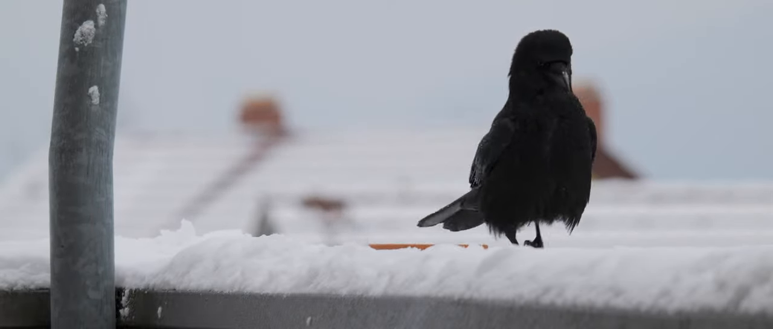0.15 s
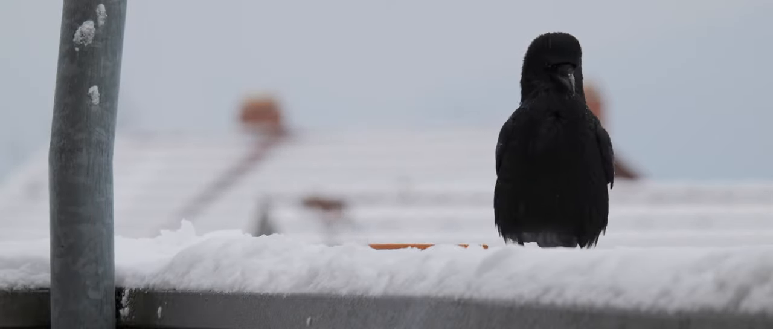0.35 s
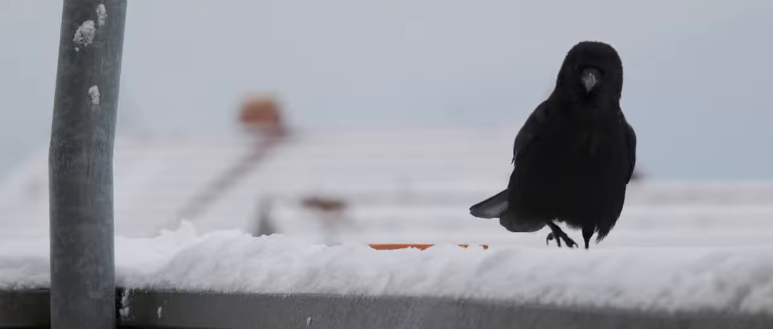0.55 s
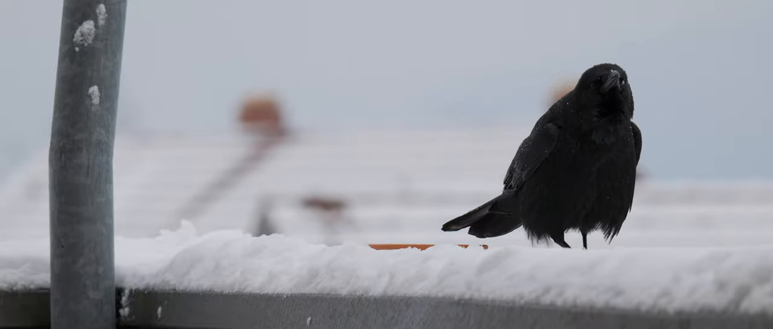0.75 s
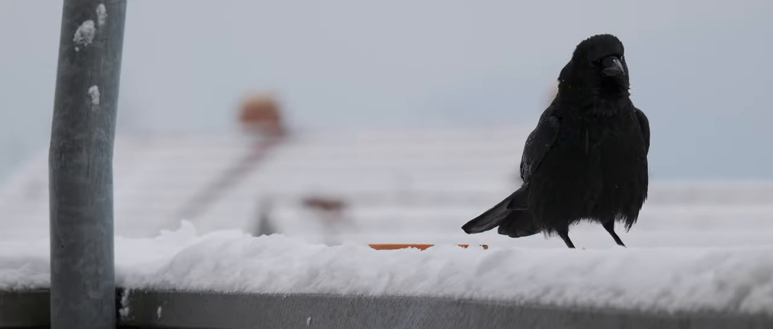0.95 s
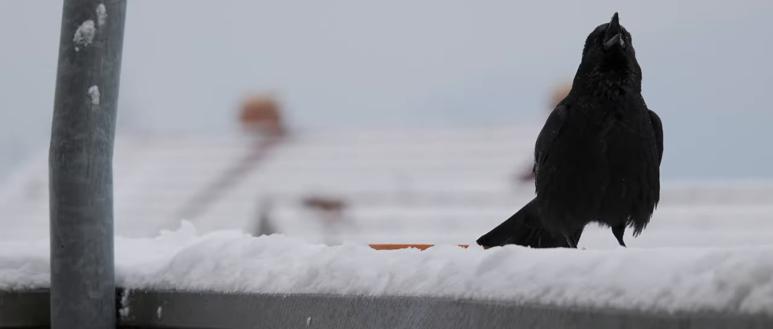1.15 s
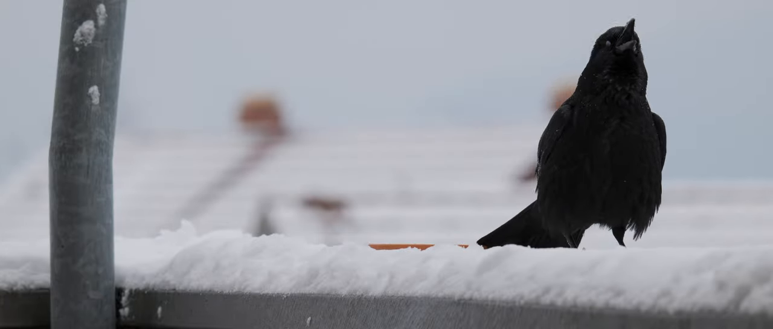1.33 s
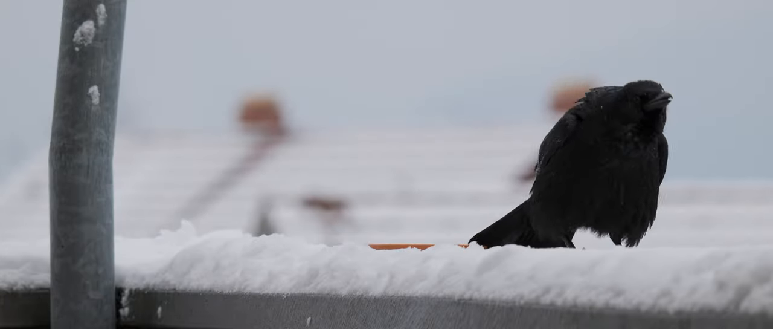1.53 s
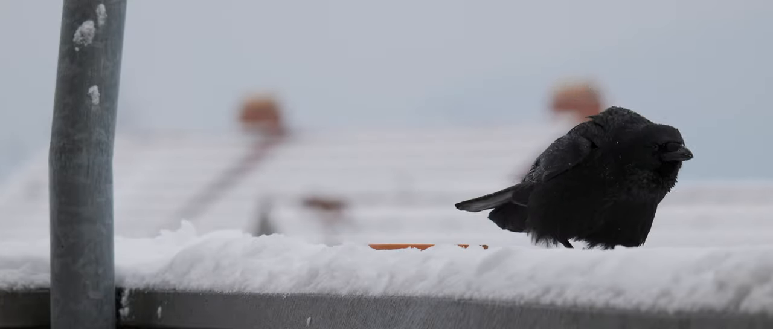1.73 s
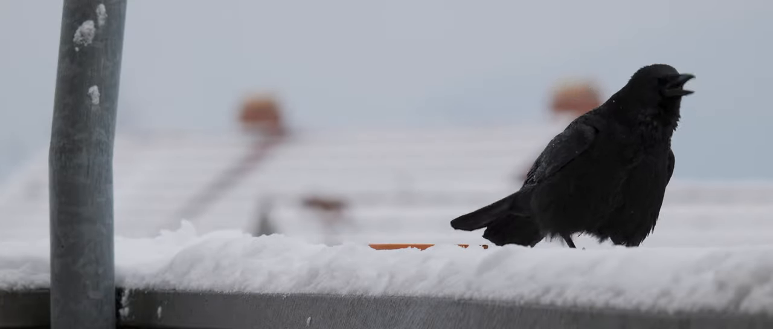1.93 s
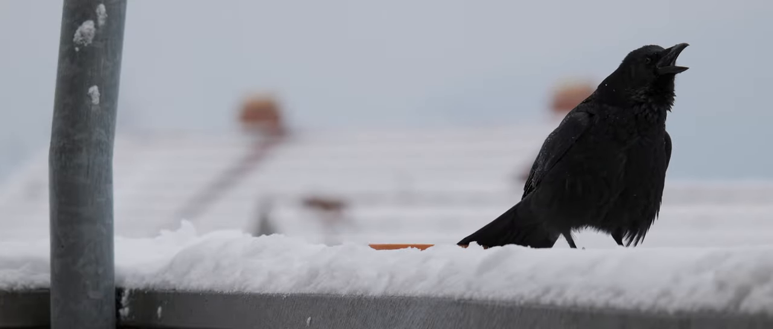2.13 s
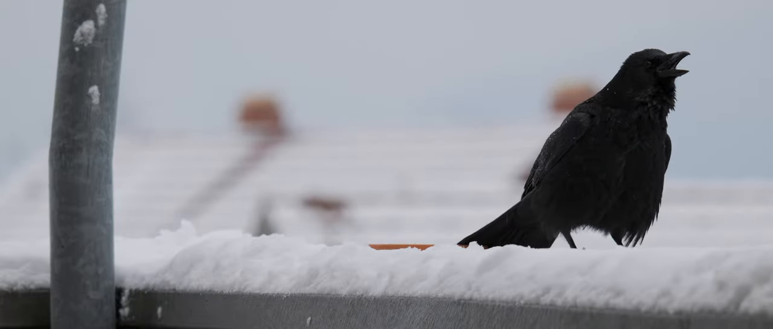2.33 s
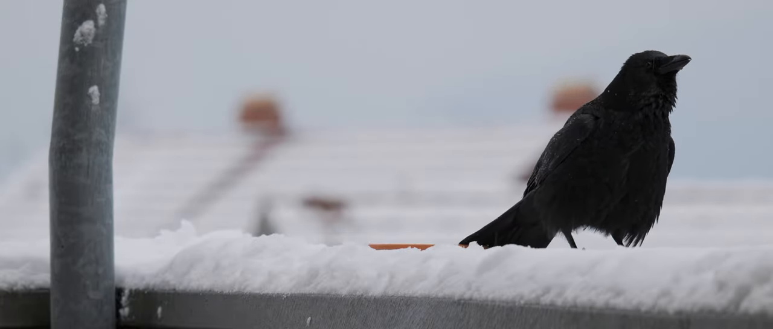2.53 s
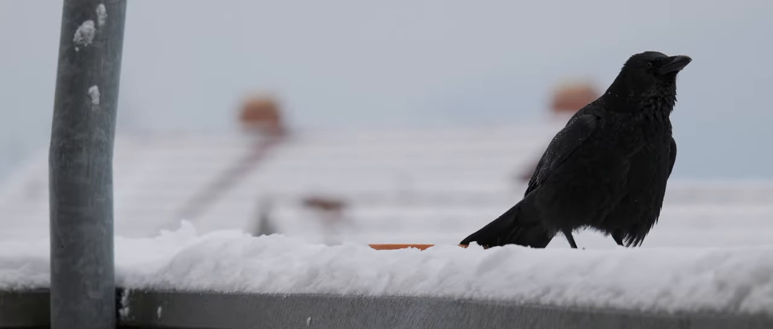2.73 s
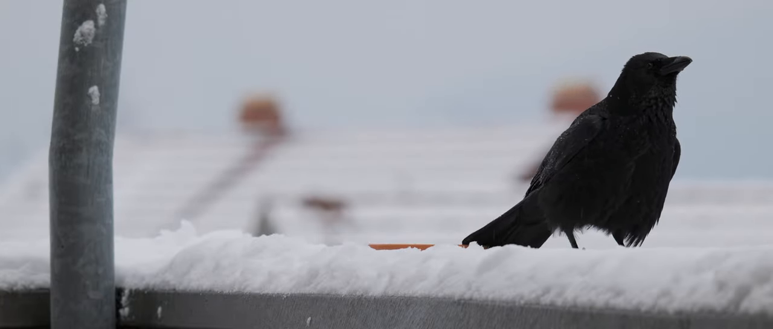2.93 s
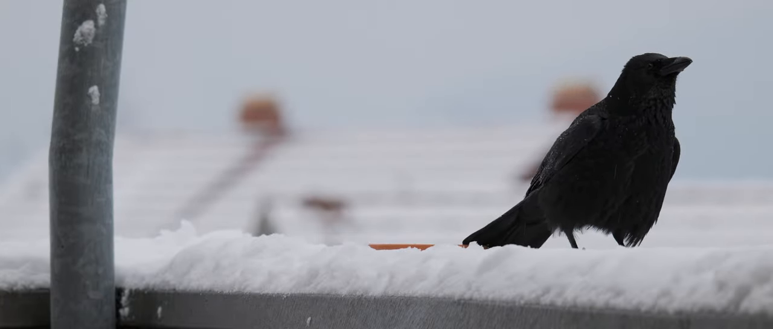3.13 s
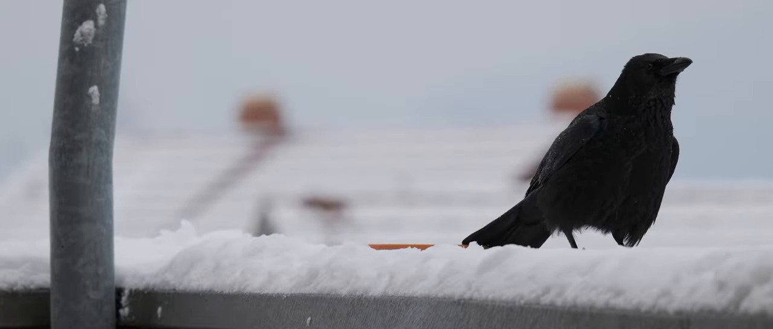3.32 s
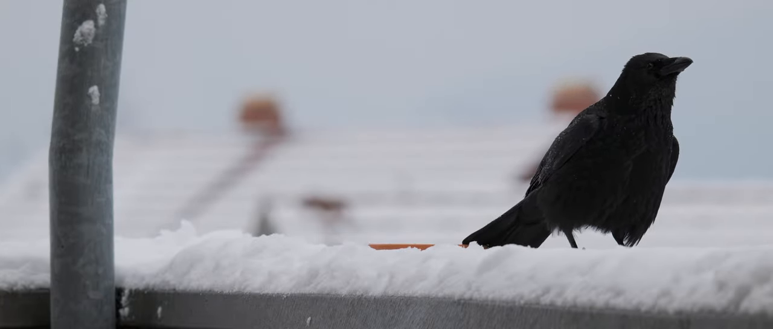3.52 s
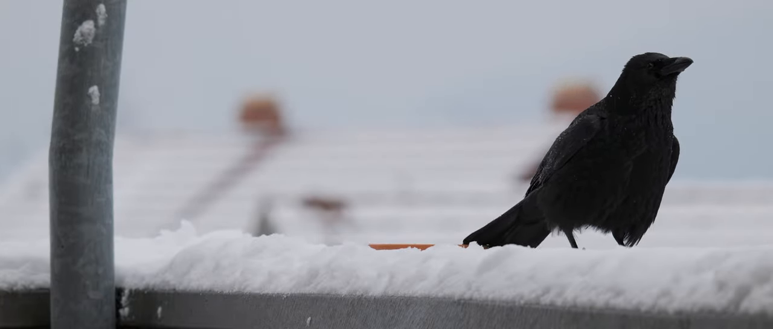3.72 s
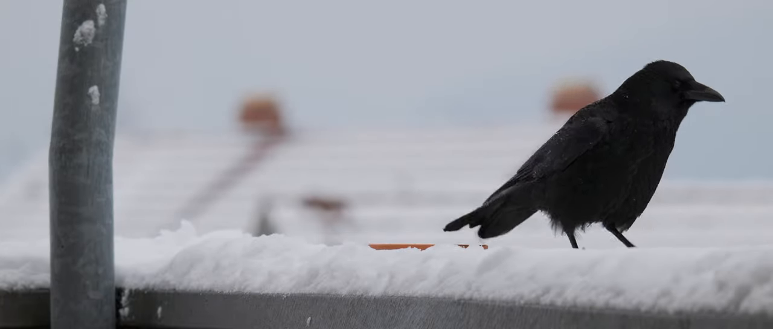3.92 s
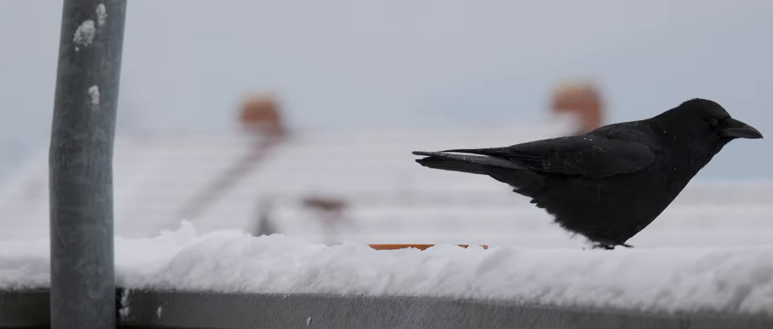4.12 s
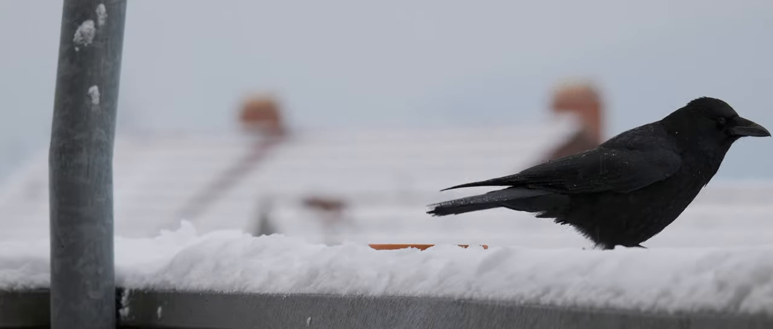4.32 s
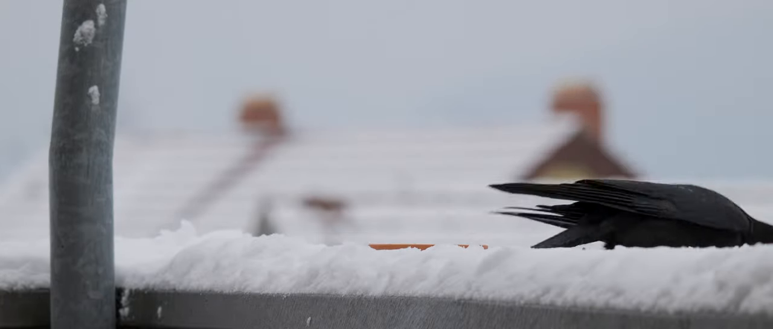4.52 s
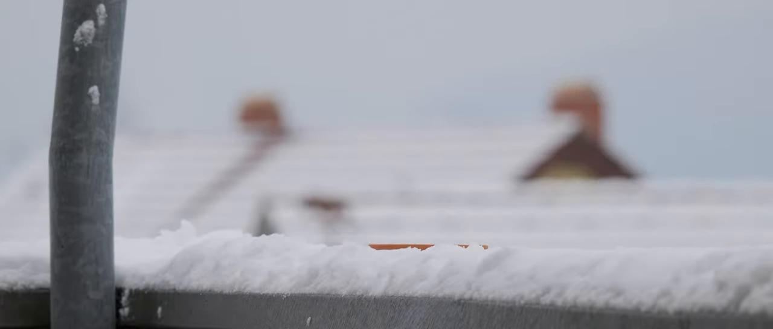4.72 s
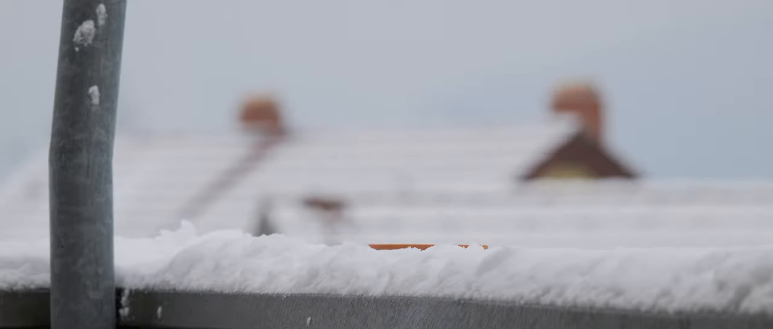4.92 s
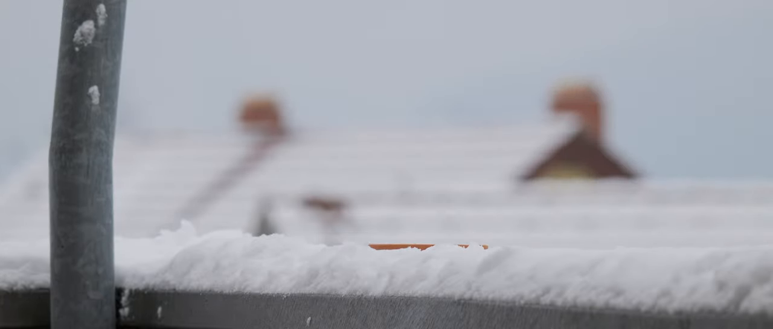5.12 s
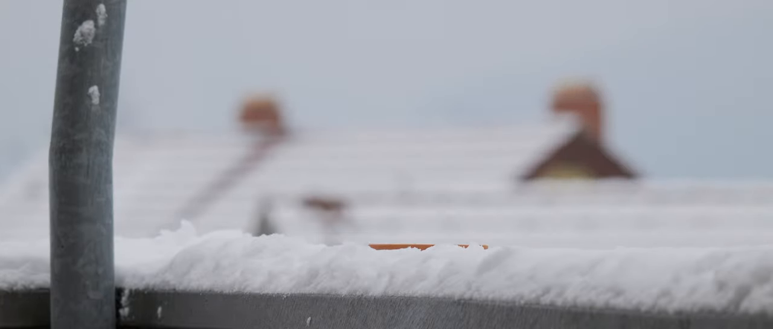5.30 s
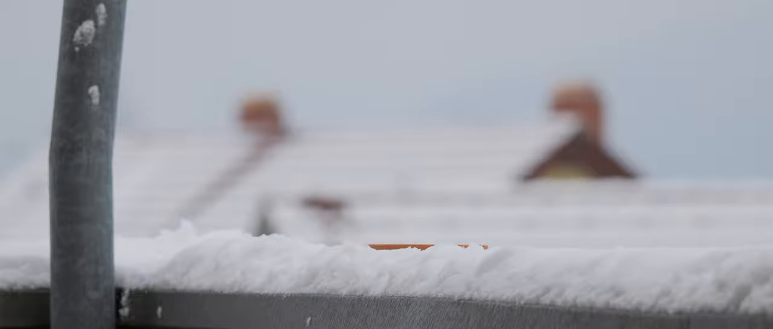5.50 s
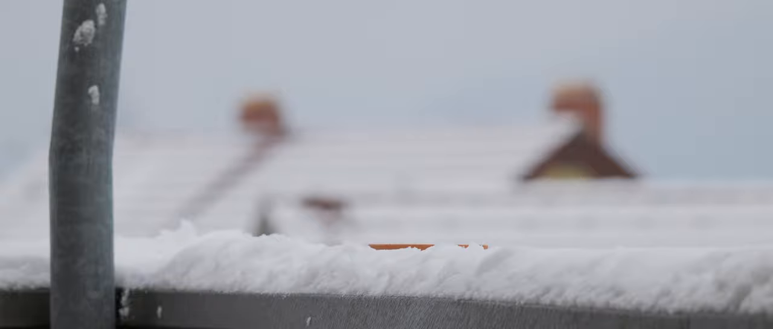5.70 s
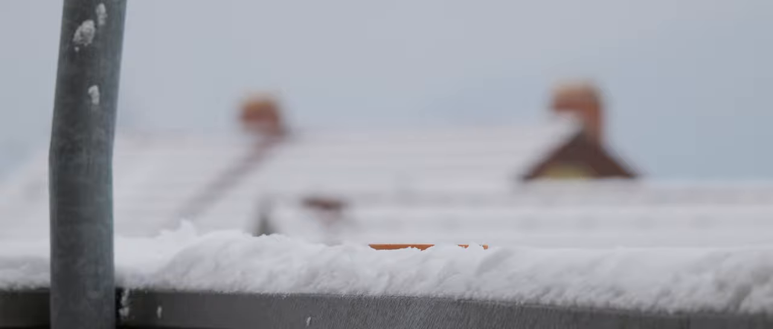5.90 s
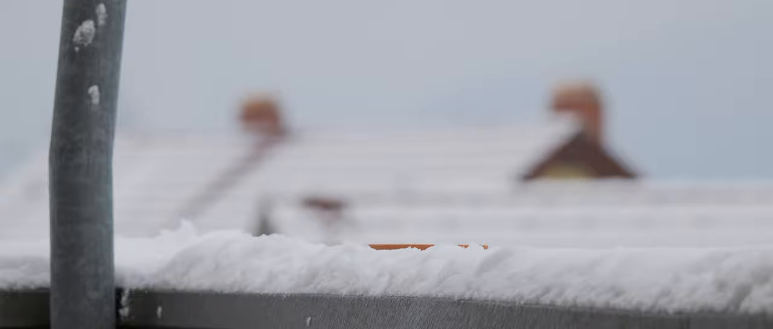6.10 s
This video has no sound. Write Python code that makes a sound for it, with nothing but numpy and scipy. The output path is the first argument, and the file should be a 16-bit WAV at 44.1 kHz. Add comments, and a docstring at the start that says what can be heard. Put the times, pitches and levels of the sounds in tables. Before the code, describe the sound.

Outdoors in a quiet snowy neighbourhood, a close crow caws twice, loud, hoarse and fluttering, each caw under half a second and ending in a small throaty puff. House walls return a short reverb. After a pause with barely audible ticks, feathers brush softly and claws knock and scrape on a sheet-metal ledge as the bird leaves. A faint low hum and soft hiss continue. Clear, fairly close stereo pickup.

```python
"""Crow on a snowy roof edge

A crow caws twice, hoarse and fluttering: overtones and noise pass through throat resonances, and house walls
answer with single copies and a decaying noise tail. Faint, evenly spaced soft ticks follow, perhaps distant
footsteps or drips; the crow shuffles, leaves with rustling feathers (all coloured bursts of grains) and knocks
on the sheet-metal ledge (decaying modes). Small tones tick and one faint note falls; a distant hum and the soft
hiss of the town, both filtered noise, lie under it all."""
import sys
import numpy as np
from scipy import signal
from scipy.fft import rfft, irfft, next_fast_len
from scipy.io import wavfile
from scipy.ndimage import uniform_filter1d, map_coordinates

SR = 44100
rng = np.random.default_rng(int(sys.argv[2]) if len(sys.argv) > 2 else 0)


def wav_out(sig):
    """Save sig, one row per channel (or a flat mono array), as 16-bit PCM at SR to the path in sys.argv[1]."""
    wavfile.write(sys.argv[1], SR, np.round(np.clip(np.atleast_2d(sig).T, -1, 1) * 32767).astype(np.int16))


N = 275669
T = np.arange(N) / SR  # time in s

# Town hum and hiss: relative noise spectra [f/Hz, density/dB] and level courses [t/s, level/dB]
HUM_SPECTRUM = [(18, -84), (30, -45), (74, -15), (135, -1.5), (200, -8.5), (225, -16.5), (386, -12.5),
                (439, -15.5), (518, -1), (571, -12.5), (620, -10), (673, -17), (1060, -27.5), (1270, -37.5),
                (1500, -31.5), (1950, -61), (3300, -120)]
HUM_LEVEL = [(0, -52.5), (5.6, -51.5), (6.25, -50.5)]
HISS_SPECTRUM = [(530, -23), (900, -4), (1170, -1.5), (1260, -10.5), (1420, -6.5), (2680, -12.5),
                 (6430, -16.5), (9320, -18), (15800, -23)]
HISS_LEVEL = [(0, -65.5), (1.5, -64.5), (3.2, -65), (4.2, -64.5), (4.9, -58), (5.4, -61), (6.25, -62.5)]

# Stereo width: side against mid, before each source's own offset [f/Hz, level/dB]
STEREO_WIDTH = [(150, -41.5), (300, -28.5), (700, -13), (1300, -6.5), (4000, -2.5), (8000, -9.5),
                (15000, -1)]

# Far note [t/s, length/s, first f/Hz, starting level/dB]
FAR_NOTE = (3.56, .28, 1885, -63)
FAR_FALL_HZ_PER_S, FAR_FADE_DB_PER_S, FAR_EDGE_S = 399, 28, .035

# Near-wall reflections [delay/s, left level/dB, right level/dB]
WALL_ECHOES = [(.0021, -6.5, -26), (.0047, -28.5, -7.5), (.0083, -15, -25), (.013, -25.5, -8),
               (.021, -16.5, -21)]
# Reverberation of the yard: decay [f/Hz, t60/s] and relative colour [f/Hz, level/dB]
YARD_DECAY = [(300, 0.31), (600, 0.65), (1000, 0.7), (1700, 0.92), (3000, 0.7), (6000, .7), (12000, 0.23)]
YARD_COLOUR = [(300, 4.5), (1000, 10), (1750, -2), (2200, -3.5), (3000, -8.5), (4500, 0.5), (6000, -8),
               (12000, -12.5)]

# Faint, evenly spaced soft ticks, perhaps distant footsteps or drips; then feathers brush and snow
# gives way, all swelling softly [t/s, hold/s, level/dB, brightest f/Hz]
SOFT_SWELLS = [(3.073, .03, -71, 9010), (3.409, .03, -68, 8520), (3.764, .027, -68, 8000),
               (4.139, .022, -66.5, 6000), (4.346, .06, -57.5, 4000), (4.36, .05, -53.5, 800),
               (4.734, .033, -58, 3900), (4.966, .06, -60, 5020), (5.12, .05, -64.5, 3500),
               (5.357, .05, -64.5, 7000), (5.523, .016, -63.5, 5900), (5.6, .05, -64.5, 6960),
               (5.947, .05, -65, 6060), (6.06, .02, -63.5, 7090)]
# Sudden flicks of wing and claw [t/s, hold/s, level/dB, brightest f/Hz]
FLICKS = [(4.661, .077, -54, 9600), (4.722, .03, -52.5, 9800), (4.88, .024, -50.5, 6010),
          (5.05, .035, -57, 2012), (5.311, .012, -59, 4005), (5.786, .03, -64, 6010),
          (6.115, .019, -55, 3500)]
SWELL_RISE, FLICK_RISE_S = .52, .003  # a swell rises over this share of its hold
BURST_T60_S = 0.073
REACH_HZ, WIDEST_OCTAVES = 13220, 1.35  # the band's spread runs from its brightest f towards REACH_HZ
STIRS_PER_S, STIR_DB = 1.3, -71  # randomly timed, fainter swells; level of the loudest

# Modes of the sheet-metal ledge [f/Hz, relative level/dB, t60/s]
LEDGE_MODES = [(1100, -5, .06), (1620, 1, .06), (1900, -11, .04), (2160, -5, .06), (2600, -11, .04)]
# Claws drag on the ledge [centre t/s, half-length/s, level/dB]
SCRAPE = (5.06, 0.16, -64)
SCRAPE_WIDTH_HZ = 50  # half-width of each mode
# Claw knocks [t/s, nominal level/dB]
KNOCKS = [(4.8839, -37), (4.912, -39), (4.9472, -44), (5.0605, -31), (5.1358, -38), (5.3137, -37)]
BOUNCE_S, BOUNCE_DB = 0.0092, -15  # a second, weaker touch follows each knock
# Small ticks [t/s, peak level/dB, f/Hz]
TICKS = [(.625, -51, 8950), (.844, -55, 9000), (1.864, -49.5, 3500), (1.929, -55.5, 3000),
         (3.28, -50, 3700), (3.853, -52, 1866), (5.789, -49.5, 2296), (5.808, -51.5, 2865)]
TICK_CYCLES = 36  # t60 in cycles

# The throat shuts on a last puff [t/s, length/s, level/dB]
CLOSINGS = [(1.498, 0.018, -33), (2.427, 0.015, -35)]
# Relative spectrum of that puff [f/Hz, density/dB]
PUFF_SPECTRUM = [(200, -25.5), (350, -5), (700, -11), (1500, -1), (2500, -12), (3300, -5.5), (4300, -16),
                 (5500, -11), (10000, -23.5), (15000, -45)]

# One course per caw [t/s, pitch f/Hz, nominal level/dB, relative treble level/dB]
CAWS = [
    [(1.098, 328, -55.5, 7), (1.103, 322.4, -41, 8), (1.118, 333.7, -25.5, 5), (1.144, 377, -15.5, -0.5),
     (1.166, 364.8, -15, -1), (1.245, 357.3, -16, 0.5), (1.3, 340.5, -14.5, 1.5), (1.375, 336.5, -14.5, 3),
     (1.46, 335.7, -16.5, -0.2), (1.482, 335.7, -23, -9.5), (1.508, 329.7, -29, 1.5),
     (1.52, 331.7, -58.5, -.6)],
    [(2.003, 336.6, -58.5, 12), (2.007, 331, -44, 10.5), (2.032, 361.8, -27, 7.5), (2.052, 377.2, -20, 3),
     (2.08, 373.4, -13.5, 0.5), (2.16, 367.2, -15.5, -2), (2.224, 349.5, -15, 3), (2.28, 339.8, -16.5, 3),
     (2.34, 334.8, -17, 1.4), (2.4, 330.2, -21, -2.5), (2.43, 326, -29.5, -8), (2.458, 327, -43, -3)],
]
# Throat flutter of each caw [t of one dip/s, rate/Hz, change of rate/(Hz/s)]
FLUTTER = [(1.325, 46.2, -6), (2.284, 45.8, -4)]
# Flutter across the spectrum [f/Hz, share of the depth, phase/rad]
FLUTTER_REACH = [(350, .15, .1), (700, .5, .1), (1050, .3, .1), (1400, .6, -1.4), (1750, .4, .1),
                 (2100, .9, .2), (2500, 1.2, .1), (3200, 1.2, .1), (6000, .7, .1)]
# Throat resonances, beak half open and wide open [f/Hz, level/dB]
THROAT_NARROW = [(180, -47.5), (300, -18), (381, -21), (521, -34), (566, -33), (734, -13), (1500, 2.5),
                 (1870, -7), (2250, -1.5), (2640, -5), (3600, -39.5), (4680, -68.5), (7920, -120)]
THROAT_WIDE = [(180, -55), (300, -20.5), (350, -25), (500, -28.5), (680, -17), (800, -27.5), (1020, -12.5),
               (1180, -17.5), (1370, 0.5), (1720, -4), (2050, -13), (2400, -12), (2750, -3.5), (3100, -12),
               (3600, -28), (4680, -55)]
# Upper windpipe resonances [f/Hz, relative level/dB]
THROAT_TREBLE = [(2500, -39), (3500, -17), (3800, -9.5), (4050, -16), (4450, -13.5), (4850, -10),
                 (5050, -16.5), (5400, -1.5), (5850, -3), (6400, -4), (6900, -4.5), (7300, -10.5),
                 (8100, -6.5), (9500, -20.5), (10300, -11.5), (11800, -16.5), (13100, -30), (15500, -35)]
# Sharp windpipe resonance that rings on through the dips [f/Hz, width/Hz, level/dB]
WINDPIPE = (1745, 45, 8)
# Colour as the beak shuts while the caw dies [f/Hz, level/dB]
BEAK_SHUT = [(1100, -1.5), (1520, 3), (1900, -3), (2700, -13), (3300, -6), (4200, -.6)]
SHUT_FADE_DB = 9  # fully shut this far under the full level
FULL_DB, HOARSE_LEAST, HOARSE_PER_DB = -15.5, .12, 0.07  # the fainter under full level, the hoarser
TENSE_HZ = 373.6  # as the pitch sags under this, the beak opens and the flutter deepens
GAPE_SAG_HZ, GAPE_MOST = 16, 0.87
FLUTTER_SAG_HZ, FLUTTER_LEAST, FLUTTER_MOST = 28.02, 0.28, 1.035
FLUTTER_FADE_DB = 12  # a fading voice loses its extra flutter by this far under full level
DIP_SHARPNESS = 2.3  # short dips between long flat tops

TOP_HZ = 15800


def amp(db):
    """Decibel law: level to amplitude ratio."""
    return 10 ** (np.asarray(db) / 20)


def unit(x):
    """Normalization to unit root mean square."""
    return x / np.sqrt(np.mean(x ** 2) + 1e-20)


def along(points, hz, axis=1):
    """Linear interpolation of one table column over log frequency."""
    p = np.transpose(points)
    return np.interp(np.log(hz + 1), np.log(p[0] + 1), p[axis])


def course(points):
    """Linear interpolation of a level course over time, as amplitude."""
    return amp(np.interp(T, *np.transpose(points)))


def wobble(rate, size):
    """Band-limited random modulation: a smooth curve through `rate` random knots a second."""
    knots = rng.standard_normal(int(size * rate / SR) + 4)
    return map_coordinates(knots, [np.arange(size) * rate / SR])


def filtered(x, response):
    """Linear filtering: multiplication of the spectrum by a response of frequency."""
    m = next_fast_len(x.shape[-1] + 8192)
    spectrum = rfft(x, m) * response(np.fft.rfftfreq(m, 1 / SR))
    return irfft(spectrum, m)[..., :x.shape[-1]]


def spread(pair, wide_db):
    """Mid-side stereo: two unrelated signals become the sum and difference of the channels."""
    side = filtered(pair[1], lambda hz: amp(along(STEREO_WIDTH, hz) + wide_db))
    return np.array([pair[0] + side, pair[0] - side])


def town():
    """Spectral shaping of noise: a low hum with a pipe-like band near 520 Hz, and a broad hiss."""
    hum = rng.standard_normal((2, N)) * amp(1.2 * wobble(9, N))
    hum = unit(filtered(hum, lambda hz: amp(along(HUM_SPECTRUM, hz)))) * course(HUM_LEVEL)
    hiss = rng.standard_normal((2, N)) * amp(.9 * wobble(5.2, N))
    hiss = unit(filtered(hiss, lambda hz: amp(along(HISS_SPECTRUM, hz)))) * course(HISS_LEVEL)
    return spread(hum, wide_db=-1) + spread(hiss, wide_db=-1.5)


def far_note():
    """Linear frequency sweep: a faint falling note from far off, perhaps another bird."""
    s, length, hz, db = FAR_NOTE
    t = T - s
    edges = np.clip(np.minimum(t, length - t) / FAR_EDGE_S, 0, 1) ** 2
    fade_db = FAR_FADE_DB_PER_S * np.clip(t, 0, length)
    level = edges * amp(db - fade_db + 2.5 * wobble(25, N))
    cycles = (hz - FAR_FALL_HZ_PER_S * t / 2) * t
    return level * np.sin(2 * np.pi * cycles + .7 * wobble(60, N))


def yard(x):
    """Reflection and reverberation: near walls send single copies, then each frequency decays at its own rate."""
    near = sum(amp([[left], [right]]) * np.roll(x, round(s * SR)) for s, left, right in WALL_ECHOES)
    mid, side = near.mean(0), (near[0] - near[1]) / 2
    side = filtered(side, lambda hz: np.minimum(1, amp(along(STEREO_WIDTH, hz) + 5)))
    hz, t, z = signal.stft(rng.standard_normal((2, SR)), SR, nperseg=256)
    decay_db = along(YARD_COLOUR, hz)[:, None] - 60 * t / along(YARD_DECAY, hz)[:, None]
    tail = signal.istft(z * amp(decay_db), SR, nperseg=256)[1]
    delayed = np.pad(x, (700, 0))[None]  # the tail starts 700 samples late
    wet = signal.fftconvolve(delayed, tail / np.linalg.norm(tail[0]), axes=1)[:, :N]
    return np.array([mid + side, mid - side]) + amp(-22) * spread(wet, wide_db=-0.3)


def grain_bursts():
    """Granular noise: bursts of fine, unevenly coloured grains make the soft ticks, rustles and flicks."""
    out = np.zeros((2, N + SR))
    t = T[:SR // 2]
    draws = rng.random((round(STIRS_PER_S * N / SR), 4))
    stirs = [(when * N / SR, .02 + 0.027 * long, STIR_DB - 4 * soft, 4000 * 2 ** high)
             for when, long, soft, high in draws]
    rows = [(SWELL_RISE * row[1], *row) for row in SOFT_SWELLS + stirs]
    rows += [(FLICK_RISE_S, *row) for row in FLICKS]
    for rise, s, hold, db, top_hz in rows:
        octaves = min(np.log2(REACH_HZ / top_hz), WIDEST_OCTAVES)
        grain_db = 2.2 * wobble(90, len(t)) + 1.2 * wobble(600, len(t))
        grains = rng.standard_normal((2, len(t))) * amp(grain_db)
        ripple_db = rng.normal(0, 2.5, 80)

        def colour(hz):
            bump = np.exp(-(np.log2((hz + 1) / top_hz) / octaves) ** 2 / 2)
            bump = bump + 0.13 * (hz > 600) * (hz < 13000)
            ripple = amp(np.interp(hz, np.linspace(0, SR / 2, len(ripple_db)), ripple_db))
            return bump / (1 + (hz / 14500) ** 4) * ripple

        swell = np.sin(np.pi / 2 * np.clip(t / rise, 0, 1)) ** 2
        decay = amp(-60 * np.clip(t - rise - hold, 0, None) / BURST_T60_S)
        out[:, round(s * SR):][:, :len(t)] += amp(db) * swell * decay * unit(filtered(grains, colour))
    return spread(out[:, :N], wide_db=-4.5)


def scrape():
    """Forced vibration: uneven friction keeps the ledge's modes humming."""
    s, length, db = SCRAPE

    def modes(f):
        return sum(amp(level) / (1 + ((f - hz) / SCRAPE_WIDTH_HZ) ** 2) for hz, level, _ in LEDGE_MODES)

    shape = amp(db + 4 * wobble(30, N)) * np.exp(-((T - s) / length) ** 4)
    return shape * unit(filtered(rng.standard_normal(N), modes))


def knocks():
    """Free vibration: struck ledge modes decay exponentially; small ticks are single short tones."""
    out, t = np.zeros(N + SR), T[:SR // 4]
    bounces = [(s + BOUNCE_S, db + BOUNCE_DB) for s, db in KNOCKS]
    for s, db in KNOCKS + bounces:
        noise = rng.standard_normal(len(t))
        thud = unit(filtered(noise, lambda hz: np.exp(-np.log2((hz + 1) / 1700) ** 2 * 1.8)))
        thud = thud * amp(-60 * t / 0.04)
        ring = np.zeros(len(t))
        for hz, level, t60 in LEDGE_MODES:  # each touch excites the modes a little differently
            decay = amp(level + rng.normal(0, 1.35) - 60 * t / t60)
            ring += decay * np.sin(2 * np.pi * hz * rng.normal(1, 0.012) * t)
        onset = 1 - np.exp(-t / 0.0006)
        out[round(s * SR):][:len(t)] += amp(db - 10) * (ring * onset + 0.52 * thud)
    for s, db, hz in TICKS:
        decay = amp(db - 60 * t * hz / TICK_CYCLES)
        roughness = (hz / 2400) ** 2 * wobble(900, len(t))  # phase in rad; higher ticks are noisier
        out[round(s * SR):][:len(t)] += decay * np.sin(2 * np.pi * hz * t + roughness)
    return out[:N]


def closings():
    """Turbulent flow: a rough, broad puff of noise ends each caw."""
    shape = sum(amp(db) * np.exp(-((T - s - length / 2) / length) ** 2 * 4) for s, length, db in CLOSINGS)
    puff = unit(filtered(rng.standard_normal(N), lambda hz: amp(along(PUFF_SPECTRUM, hz))))
    return shape * amp(3 * wobble(300, N)) * puff


def caw(rows, dip_s, flutter_rate, drift):
    """Source and filter: overtones and hoarse noise through a throat that opens and flutters."""
    s, *cols = np.transpose(rows)
    t = T[round(s[0] * SR):round(s[-1] * SR)]
    size = len(t)
    pitch, db, treble_db = [np.interp(t, s, c) for c in cols]
    sag, faint = TENSE_HZ - pitch, np.maximum(FULL_DB - db, 0)
    hoarse = np.clip(HOARSE_LEAST + HOARSE_PER_DB * faint, 0, 1)
    gape = np.clip(GAPE_MOST * np.clip(sag / GAPE_SAG_HZ, 0, 1), 0, 1)

    # flutter: periodic dips in level and pitch
    slack = np.clip(sag / FLUTTER_SAG_HZ, 0, 1)
    strength = np.clip(1 - (faint / FLUTTER_FADE_DB) ** 2, 0, 1)
    depth = FLUTTER_LEAST + (FLUTTER_MOST - FLUTTER_LEAST) * slack * strength
    since = t - dip_s
    beat = 2 * np.pi * (flutter_rate + drift * since / 2) * since + .07 * wobble(20, size)

    def dip(phase):
        return np.exp(DIP_SHARPNESS * (np.cos(beat + phase) - 1))

    def pulse(hz):
        return 1 - depth * along(FLUTTER_REACH, hz) * dip(along(FLUTTER_REACH, hz, axis=2))

    # the pitch drops in each dip and lies a little above its mean in between
    bend = .023 * depth * (dip(.1) * np.exp(DIP_SHARPNESS) / np.i0(DIP_SHARPNESS) - 1)
    jitter = hoarse * (.022 * wobble(150, size) + 0.013 * wobble(40, size))
    cycle = 2 * np.pi * np.cumsum(pitch * (1 + jitter - bend)) / SR

    # overtones weighted by the throat
    order = np.arange(1, 45)[:, None]
    hz = order * pitch
    low_db = (1 - gape) * along(THROAT_NARROW, hz) + gape * along(THROAT_WIDE, hz)
    high_db = along(THROAT_TREBLE, hz * (1 - bend)) - 14 + treble_db
    throat_db = np.where(hz < 3600, low_db, high_db)
    shimmer = np.array([wobble(40, size) for _ in hz]) * (.6 + 2.4 * np.sqrt(hoarse))
    shimmer = shimmer * np.minimum(1, order / 3)  # low overtones stay steadier
    waves = np.sin(order * cycle + rng.normal(0, 1.1, order.shape))
    lines = amp(throat_db + shimmer) * pulse(hz) * waves
    power = (amp(throat_db) ** 2).sum(0) / 2
    voice = lines.sum(0) / np.sqrt(uniform_filter1d(power, 500))

    # hoarse noise: air escapes once a cycle
    puffs = rng.standard_normal((3, size)) * (1 + 0.68 * np.cos(cycle))
    throats = (THROAT_NARROW, THROAT_WIDE, THROAT_TREBLE)
    narrow, wide, top = (unit(filtered(p, lambda f: amp(1.3 * along(c, f)))) for p, c in zip(puffs, throats))
    rasp = (np.sqrt(1 - gape) * narrow + np.sqrt(gape) * wide) * pulse(1750)
    air = amp(treble_db - 12.5) * np.sqrt(hoarse) * top * pulse(6000)
    sound = amp(db) * (np.sqrt(1 - hoarse) * voice + (.12 + hoarse) * rasp + air)

    # the beak shuts in the second half as the level falls
    shut = np.clip(faint / SHUT_FADE_DB, 0, 1) * (t > t.mean())
    sound = (1 - shut) * sound + shut * filtered(sound, lambda f: amp(along(BEAK_SHUT, f)))
    pipe_hz, width, pipe_db = WINDPIPE

    def resonance(f):
        return amp(pipe_db) * 1j * f * width / (pipe_hz ** 2 - f * f + 1j * f * width)

    out = np.zeros(N)
    out[round(s[0] * SR):][:size] = sound + filtered(gape * sound, resonance)
    return out


def scene():
    """Superposition: crow and ledge in the yard, over the town."""
    crow = sum(caw(rows, *beat) for rows, beat in zip(CAWS, FLUTTER)) + closings()
    claws = knocks() + scrape()
    echoes = yard(crow + amp(4.5) * claws)
    return crow + claws + echoes + grain_bursts() + far_note() + town()


def record(dry):
    """Band limiting: a gentle cut of the deep bass below 55 Hz and nothing from TOP_HZ up."""
    return filtered(dry, lambda hz: (hz < TOP_HZ) / np.sqrt(1 + (55 / (hz + 1)) ** 4))


dry = scene()
out = record(dry)
wav_out(out)
```